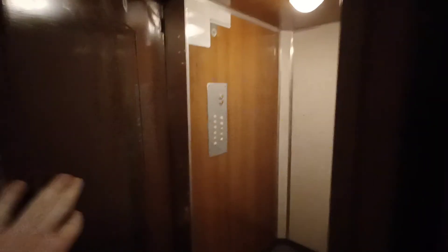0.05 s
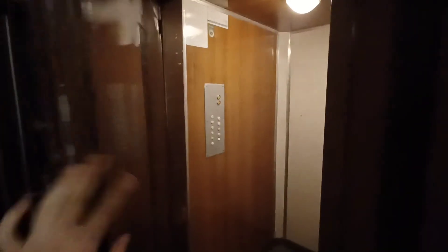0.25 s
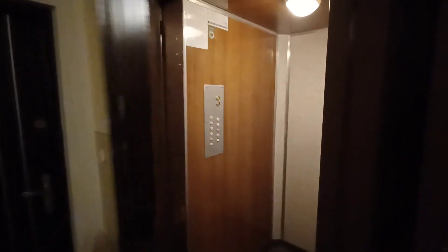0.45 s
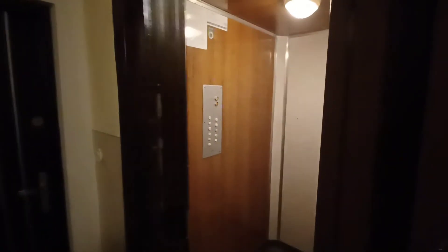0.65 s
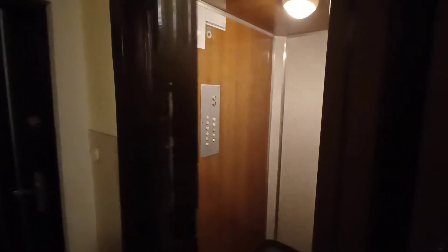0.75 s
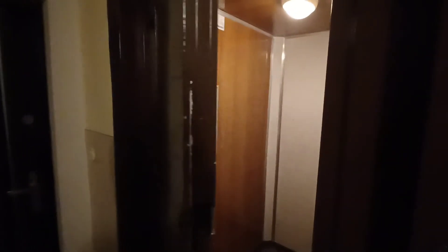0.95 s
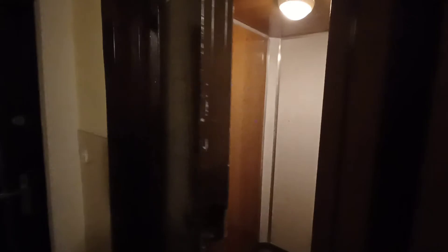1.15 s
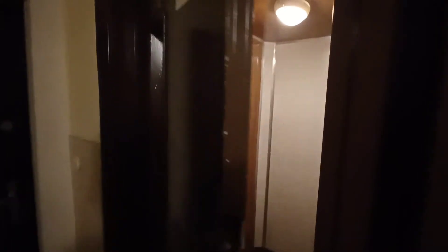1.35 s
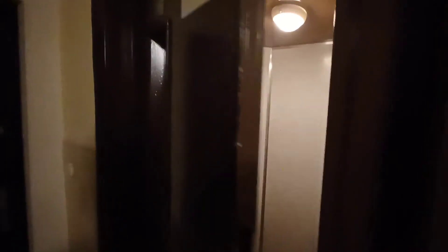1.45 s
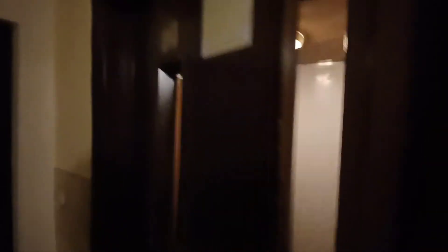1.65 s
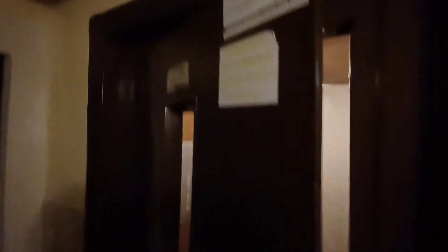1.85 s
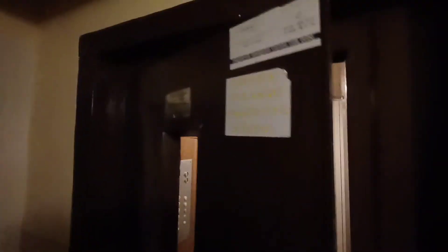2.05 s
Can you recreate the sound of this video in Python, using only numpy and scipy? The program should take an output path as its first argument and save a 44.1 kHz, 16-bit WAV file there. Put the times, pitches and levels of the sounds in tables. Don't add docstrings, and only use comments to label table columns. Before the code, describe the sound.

Lift door clatters closed with a sudden cluster of metallic knocks, scrapes and small squeaks

```python
import sys
import numpy as np
from scipy import signal
from scipy.fft import rfft, irfft, next_fast_len
from scipy.io import wavfile

SR = 44100
rng = np.random.default_rng(int(sys.argv[2]) if len(sys.argv) > 2 else 0)


def gain_from_decibels(decibels):
    exponent = np.asarray(decibels, float) / 20
    return 10 ** exponent


def transcribe(u):
    v = np.clip(np.atleast_2d(u).T, -1, 1)
    q = np.round(v * 32767).astype(np.int16)
    wavfile.write(sys.argv[1], SR, q)


N = 92830

# (pitch [Hz], level [dB])
AIR_COLOUR = [(25, -16), (60, 11), (180, -3), (470, -15), (1200, -6), (2000, -2.5), (5000, 0), (13000, -11)]
# (time [s], force [dB], brightness [dB per octave])
ROLL_FORCE = [(0, -55, 3.5), (.2, -54.5, 1.2), (.3, -56.5, -0.2), (.5, -62, -3), (0.651, -61.5, 2),
              (.8, -75.5, 0), (1.161, -73, 4), (1.19, -40.5, 0.5), (1.31, -37.5, -3), (1.345, -40.5, -1.8),
              (1.43, -44, 0.5), (1.52, -43.5, 1.5), (1.565, -48.5, .3), (1.67, -51.5, 0.5), (1.77, -54, -7),
              (1.88, -60.5, 2), (2.0, -56, 3), (2.1, -62, -3)]
# (pitch [Hz], level [dB], time to fall 60 dB [s])
LEAF_MODES = [(70, -9, 1), (104.4, -16, 0.29), (130.3, -4.5, 0.15), (150, -7, 0.19), (179.7, -10, 0.12),
              (204.4, -4.5, 0.17), (232, -1, 0.203), (266.6, -5, 0.16), (326.6, -4.5, 0.076),
              (390, -7.5, .1), (449.7, -9, 0.11), (559, -17, 0.091), (719, -18, 0.12), (871.3, -15, 0.097)]
# (pitch [Hz], level [dB])
RATTLE_COLOUR = [(18, -71), (30, -39), (64, 2), (85, -26), (114, 10), (234, -6), (613, -12.5), (2500, -51),
                 (3250, -67), (5500, -120)]
# (start [s], rise [s], hold [s], level [dB], tilt [dB per octave])
SCRAPES = [(-.05, .05, 0.05, -56, 1.4), (0.006, 0.068, 0.1, -52.5, 3.5), (0.151, 0.04, 0.088, -52.5, 1.5),
           (0.296, 0.016, 0.08, -59, 2.5), (0.377, 0.056, 0.19, -65, 2.3), (0.492, 0.13, 0.075, -61.5, 1),
           (0.715, 0.036, 0.13, -67.5, 3.5), (1.117, 0.048, .01, -57.5, 4.5),
           (1.177, 0.01, 0.063, -50, 1.2), (1.265, 0.015, 0.1, -56, -0.5), (1.387, 0.011, 0.038, -48.5, 4),
           (1.44, 0.013, 0.044, -45.5, 0), (1.541, 0.047, 0.23, -56, -1.7), (1.603, 0.023, 0.065, -61.5, 8),
           (1.74, .13, 0.064, -54, -3)]
# (pitch [Hz], level [dB])
SCRAPE_COLOUR = [(240, -28), (400, -9.5), (749, -3), (1490, -8.5), (2120, -14), (4780, -10.5),
                 (7450, -17.5), (12000, -25.5), (15500, -27)]
# (start [s], length [s], pitch [Hz], wander [Hz], level [dB])
GROANS = [(-.02, 0.23, 70, 4, -63), (-.02, 0.059, 150, 8, -54), (-.02, .045, 270, 11, -55.5),
          (0.033, 0.058, 232, 3.6, -49.5), (0.074, 0.052, 140, 4.8, -51), (.135, 0.056, 145, 6.9, -55.5),
          (.175, 0.044, 236, 3.4, -49.5), (0.224, 0.045, 140, 5, -57), (.27, 0.06, 290, 25, -60.5),
          (.36, 0.041, 360, 15.4, -64), (0.302, .24, 130, 5.2, -66), (.56, 0.064, 230, 23, -68.5),
          (1.216, 0.046, 130, 9.9, -41.5), (1.262, 0.04, 121.9, 5.9, -44), (1.291, 0.047, 110, 6.4, -43),
          (1.268, 0.021, 200, 10, -42.5), (1.295, 0.024, 195, 11, -39.5), (1.346, 0.069, 135, 10.6, -47.5),
          (1.41, 0.045, 140, 15.3, -49), (1.456, 0.056, 120, 9.1, -43.5), (1.499, 0.029, 200, 8.7, -43),
          (1.558, 0.092, 140, 14, -50), (1.52, 0.32, 74, 5.9, -59), (1.643, 0.091, 113, 8, -55.5),
          (1.756, .11, 124.1, 5.9, -55), (1.892, .035, 400, 17.2, -59.5), (1.942, .07, 390, 23, -59.5),
          (1.957, 0.081, 126.5, 4.1, -59), (2.03, 0.085, 381, 24.6, -65)]
# (time [s], peak [dB], pitch of the struck part [Hz])
KNOCKS = [(.002, -53, 256), (0.084, -56, 142), (1.165, -48, 335), (1.187, -38.5, 200), (1.205, -39, 198),
          (1.217, -33.5, 390), (1.24, -36, 322), (1.269, -34, 124), (1.288, -36.5, 256), (1.308, -39, 192),
          (1.399, -41.5, 245), (1.46, -37, 225), (1.478, -41, 140), (1.512, -37, 208), (1.54, -46.5, 200),
          (1.656, -42.5, 122), (1.955, -46.5, 404), (2.03, -51.5, 378)]
# (start [s], length [s], pitch [Hz],
# wander [Hz], level [dB])
SQUEALS = [(0.193, 0.086, 2410, 18.4, -63), (0.545, 0.085, 1400, 34, -69), (0.632, .045, 1385, 40, -65),
           (.68, 0.063, 1390, 20.3, -73), (.92, 0.082, 1420, 29.6, -81), (1.396, 0.025, 5390, 110, -49.5),
           (1.39, 0.042, 1718, 11.2, -62.5), (1.205, 0.031, 5750, 100, -56.5),
           (1.9, 0.065, 2000, 59.6, -70), (1.68, 0.073, 1700, 42, -67.5), (1.78, .1, 1500, 35, -60.5),
           (1.835, 0.036, 1100, 20.6, -63), (1.905, .055, 1415, 29.6, -61.5),
           (1.975, 0.077, 1430, 35.2, -67.5), (0.194, 0.147, 5200, 502, -65), (.3, 0.176, 2350, 90, -77),
           (0.674, .25, 2200, 69, -80.5), (1.185, 0.034, 3250, 200, -60.5), (1.2, .065, 3950, 120, -61.5),
           (1.245, 0.064, 3050, 450, -61), (1.185, 0.049, 740, 69, -55.5), (1.397, 0.018, 12800, 300, -63),
           (1.452, 0.024, 3000, 248, -53.5), (1.455, 0.043, 4500, 500, -54.5), (1.5, 0.063, 790, 30, -58),
           (1.45, .05, 620, 81, -54.5), (1.6, 0.073, 2080, 70, -70)]
# (pitch [Hz], time to fall 60 dB [s])
ECHO_TIME = [(100, 0.4), (1000, 0.8), (5000, 0.27), (14000, 0.51)]
# (pitch [Hz], likeness [0-1])
PORT_LIKENESS = [(25, .8), (60, .99), (200, .97), (640, .78), (1400, 0.1)]
# (pitch [Hz], difference [dB])
PORT_DIFFERENCE = [(60, -3), (380, -0.5), (700, -0.7), (1300, -4), (2400, -12), (4400, -10), (8000, -2.5),
                   (12000, -11)]

AIR_DB, HISS_LEFT_DB = -64.5, -3.5
HUM_HZ, HUM_WANDER_HZ, HUM_WAVER_DB, HUM_DB = 126, 2.2, 2.2, -69
BUMPS_PER_S, BUMP_SPREAD_DB, ROLL_DB, RATTLE_DB = 1500, 1.5, -2, -6
GRIT_PER_S, GRIT_SPREAD_DB, SCRAPE_FADE_S = 2500, 2, .05
KNOCK_DB, KNOCK_SPREAD_OCT, CONTACT_S = -6, 0.51, 0.0011
RISE_SHARE, SQUEAL_FADE_S, SQUEAL_WAVER_DB = 0.14, 0.0089, 2.5
ECHO_DB, ECHO_BASS_HZ = -6, 292
LOW_CUT_HZ, TOP_HZ, RIGHT_LAG_S = 86.6, 15750, .00017
NOTCH_HZ, NOTCH_OCT, NOTCH_DB = np.array([[8600], [7800]]), np.array([[.28], [.22]]), np.array([[-11], [-15]])
PORT_HZ, PORT_OCT, PORT_DB = 2134, 0.25, 6
SHELL_HZ, SHELL_OCT, SHELL_DB = 12620, 0.14, np.array([[.3], [4]])


def curve(table, hz):
    a = np.array(table, float)
    return np.interp(np.log(np.maximum(hz, 1)), np.log(a[:, 0]), a[:, 1])


def shape(x, gain):
    m = next_fast_len(N + 8192)
    return irfft(rfft(x, m) * gain(np.fft.rfftfreq(m, 1 / SR)), m)[..., :N]


def unit(x):
    return x / np.sqrt(np.mean(x ** 2))


def ring(x, hz, t60):
    r = np.exp(-np.log(1000) / (max(t60, .004) * SR))
    w = 2 * np.pi * hz / SR
    return signal.lfilter([np.sin(w) * np.sqrt(4 * (1 - r))], [1, -2 * r * np.cos(w), r * r], x)


def grains(per_s, spread_db):
    on = rng.random(N) < per_s / SR
    return unit(on * rng.standard_normal(N) * gain_from_decibels(spread_db * rng.exponential(size=N)))


def gate(t, start, rise, hold, fade):
    up = np.clip((t - start) / max(rise, 1e-3), 0, 1)
    late = np.maximum(t - start - rise - hold, 0)
    return up ** 2 * np.exp(-late * np.log(1000) / (6 * fade))


def walk(per_s):
    step = 32
    count = N // step + 2
    f = np.fft.rfftfreq(count, step / SR)
    slow = irfft(rfft(rng.standard_normal(count)) / (1 + (f / per_s) ** 2), count)
    return np.interp(np.arange(N) / step, np.arange(count), unit(slow))


def whine(hz, wander_hz, waver_db, per_s):
    level = np.sqrt(2) * gain_from_decibels(waver_db * walk(per_s))
    turns = np.cumsum(hz + wander_hz * walk(per_s)) / SR
    return level * np.sin(2 * np.pi * turns)


def pair(a, b):
    alike = lambda f: np.clip(curve(PORT_LIKENESS, f), 0, 1)
    mid = shape(a, lambda f: np.sqrt((1 + alike(f)) / 2))
    side = shape(b, lambda f: np.sqrt((1 - alike(f)) / 2))
    return np.array([mid + side, mid - side])


def landing():
    air = [gain_from_decibels(AIR_DB) * unit(shape(rng.standard_normal(N), lambda f: gain_from_decibels(curve(AIR_COLOUR, f))))
           for port in range(2)]
    hum = gain_from_decibels(HUM_DB) * whine(HUM_HZ, HUM_WANDER_HZ, HUM_WAVER_DB, 4.5)
    return pair(air[0] + hum, air[1]) * gain_from_decibels(np.array([[HISS_LEFT_DB], [0]]))


def rolling_leaf(force, bright_db):
    total = np.sqrt(sum(gain_from_decibels(db) ** 2 for _, db, _ in LEAF_MODES))
    bumps = grains(BUMPS_PER_S, BUMP_SPREAD_DB) * force * gain_from_decibels(ROLL_DB) / total
    roll = np.zeros(N)
    for k, (hz, db, t60) in enumerate(LEAF_MODES):
        shake = bumps * gain_from_decibels(db + bright_db * np.log2(hz / 200))
        roll += (-1) ** k * ring(shake, hz, t60)
    return roll


def rattling_panels(force, bright_db):
    colour = lambda f: gain_from_decibels(curve(RATTLE_COLOUR, f)) * (f < 2500) * f / (f + 400)
    return gain_from_decibels(RATTLE_DB + bright_db) * force * unit(shape(rng.standard_normal(N), colour))


def scraping_shoes(t):
    out = np.zeros(N)
    for start, rise, hold, db, tilt_db in SCRAPES:
        tilt = lambda f: tilt_db * np.log2(np.maximum(f, 200) / 3500)
        colour = lambda f: gain_from_decibels(curve(SCRAPE_COLOUR, f) + tilt(f)) * f / (f + 300)
        rub = grains(GRIT_PER_S, GRIT_SPREAD_DB) + rng.standard_normal(N)
        out += gain_from_decibels(db) * gate(t, start, rise, hold, SCRAPE_FADE_S) * unit(shape(rub, colour))
    return out


def stick_slip(t, events):
    out = np.zeros(N)
    for start, length, hz, wander_hz, db in events:
        tone = whine(hz, wander_hz, SQUEAL_WAVER_DB, min(3 * wander_hz, 300))
        rise = RISE_SHARE * length
        out += gain_from_decibels(db) * gate(t, start, rise, length - rise, SQUEAL_FADE_S) * tone
    return out


def knocking_leaf(t):
    modes_hz = np.array(LEAF_MODES)[:, 0]
    hits = np.zeros((len(LEAF_MODES), N))
    for s, db, hz in KNOCKS:
        push = np.exp(-((t - s) / CONTACT_S) ** 2 * 2)
        near = 0.078 + np.exp(-(np.log2(modes_hz / hz) / KNOCK_SPREAD_OCT) ** 2)
        sign = np.sign(rng.standard_normal(len(LEAF_MODES)))
        hits += np.outer(sign * near, push / push.sum()) * gain_from_decibels(db + KNOCK_DB) * 32
    return sum(ring(hit, hz, t60) for hit, (hz, _, t60) in zip(hits, LEAF_MODES))


def stairwell(x):
    t = np.arange(SR) / SR
    tail = np.zeros(N)
    for hz in 63 * 2 ** np.arange(9):
        octave = lambda f: np.clip(1 - abs(np.log2(np.maximum(f, 1) / hz)), 0, 1) ** .5
        band = shape(rng.standard_normal(N), octave)[:SR]
        fade = np.exp(-np.log(1000) * t / curve(ECHO_TIME, hz)) * np.clip(t / 0.013, 0, 1)
        bass_cut = hz / np.hypot(hz, ECHO_BASS_HZ)
        tail[:SR] += bass_cut * band * fade / np.sqrt(np.sum(fade ** 2))
    return x + gain_from_decibels(ECHO_DB) * signal.fftconvolve(x, tail)[:N]


def scene():
    t = np.arange(N) / SR
    s, force_db, bright_db = np.array(ROLL_FORCE).T
    force, bright_db = gain_from_decibels(np.interp(t, s, force_db)), np.interp(t, s, bright_db)
    knocks = knocking_leaf(t)
    door = []
    for port in range(2):
        leaf = rolling_leaf(force, bright_db) + rattling_panels(force, bright_db) + knocks
        rail = scraping_shoes(t) + stick_slip(t, GROANS + SQUEALS)
        door.append(stairwell(leaf + rail))
    return pair(*door) + landing()


def band_limit(x):
    return signal.sosfilt(signal.butter(12, 15730, fs=SR, output="sos"), x)


def record(dry):
    bump = lambda f, hz, octs, db: db * np.exp(-(np.log2(np.maximum(f, 1) / hz) / octs) ** 2)
    notch = lambda f: bump(f, NOTCH_HZ, NOTCH_OCT, NOTCH_DB)
    peaks = lambda f: bump(f, PORT_HZ, PORT_OCT, PORT_DB) + bump(f, SHELL_HZ, SHELL_OCT, SHELL_DB)
    ports = lambda f: np.outer([.5, -.5], curve(PORT_DIFFERENCE, f))
    lag = lambda f: np.exp(-2j * np.pi * np.outer([0, RIGHT_LAG_S], f))
    low_cut = signal.butter(N=3, Wn=LOW_CUT_HZ, btype="high", fs=SR, output="sos")
    heard = signal.sosfilt(low_cut, dry)
    mix = shape(heard, lambda f: gain_from_decibels(ports(f) + notch(f) + peaks(f)) * (f < TOP_HZ) * lag(f))
    return band_limit(mix)


dry = scene()
out = record(dry)
transcribe(out)
```